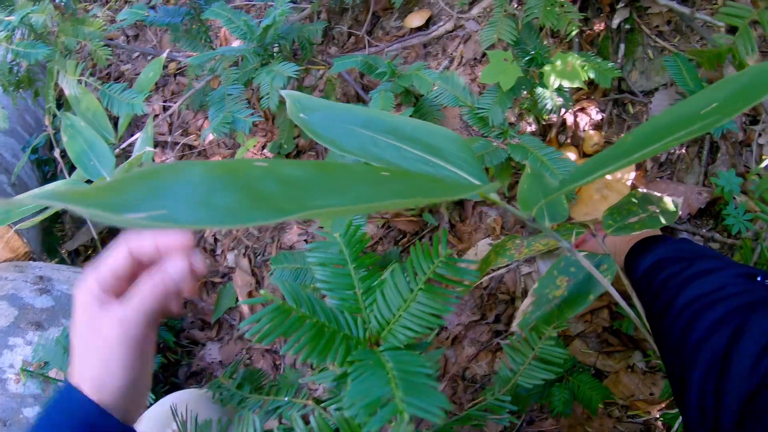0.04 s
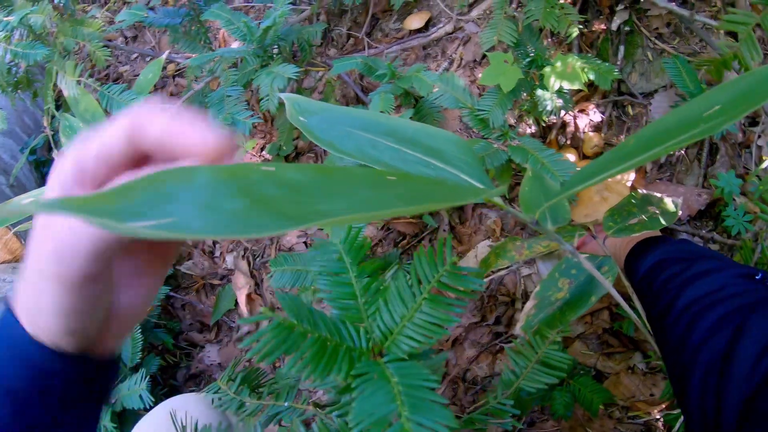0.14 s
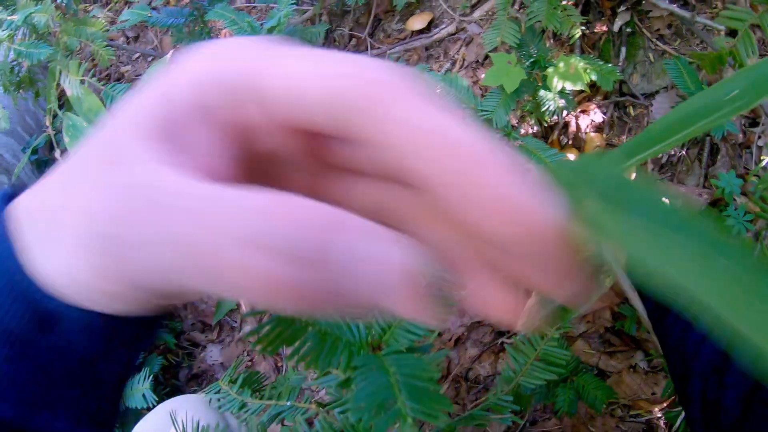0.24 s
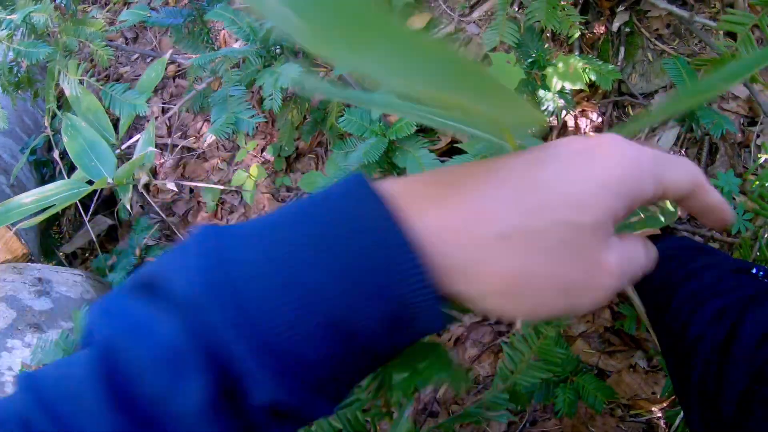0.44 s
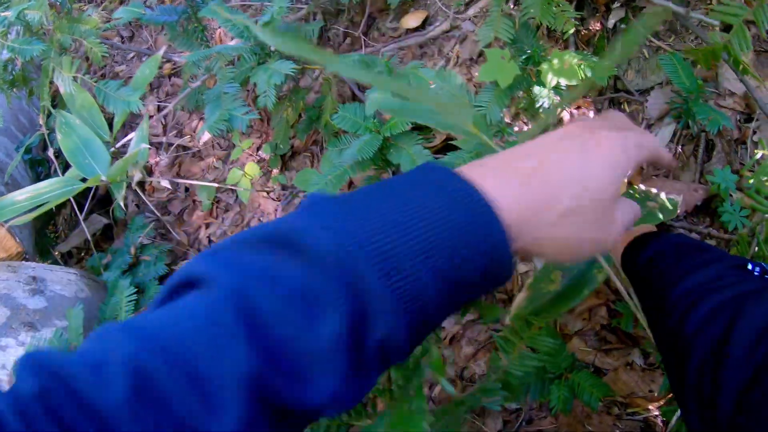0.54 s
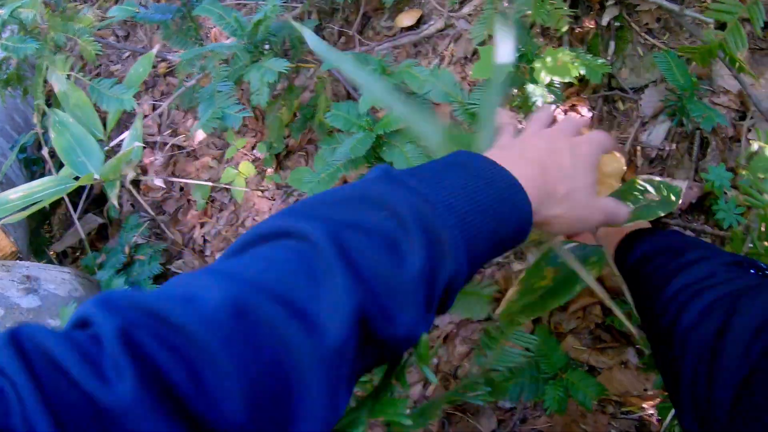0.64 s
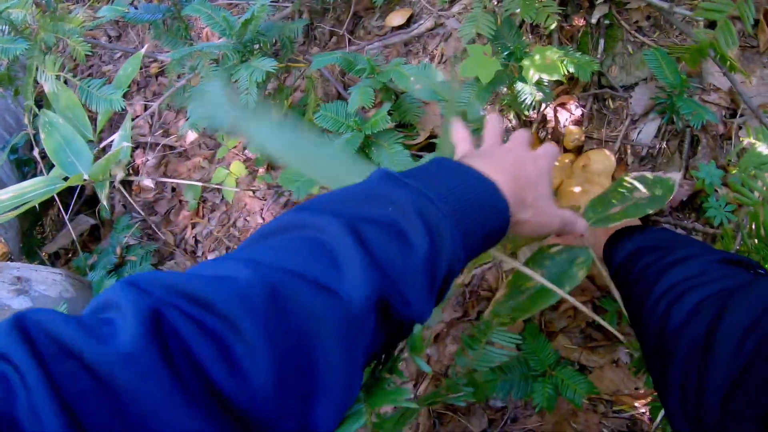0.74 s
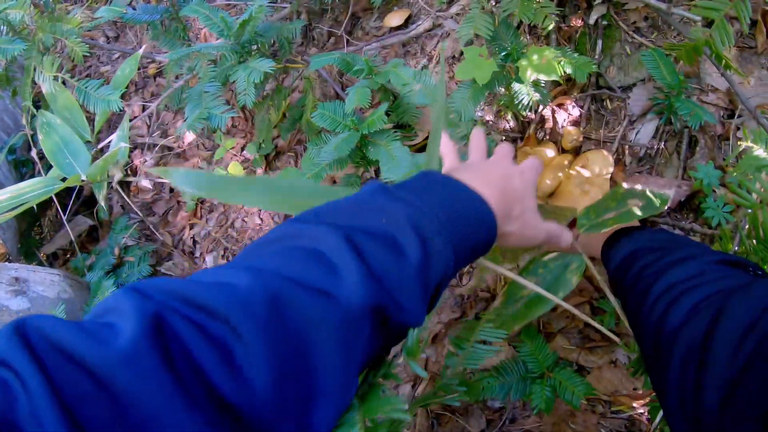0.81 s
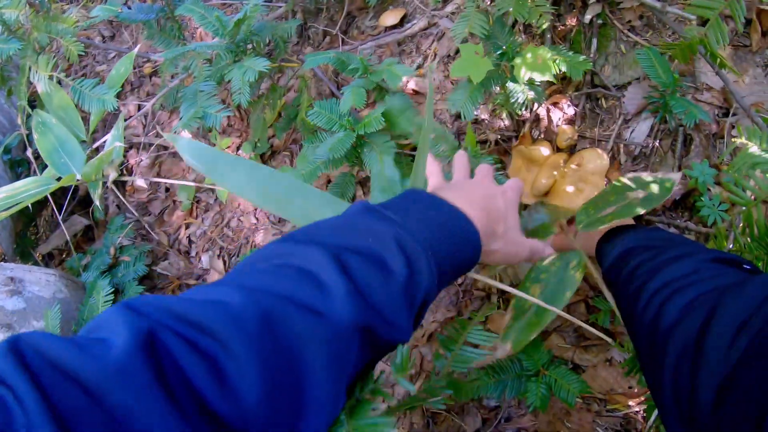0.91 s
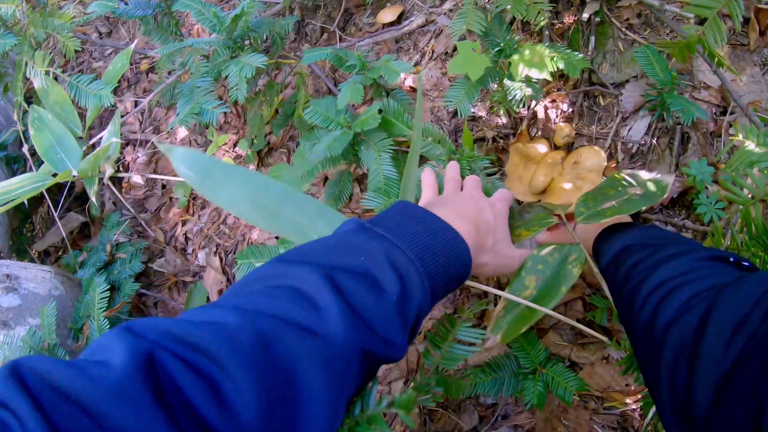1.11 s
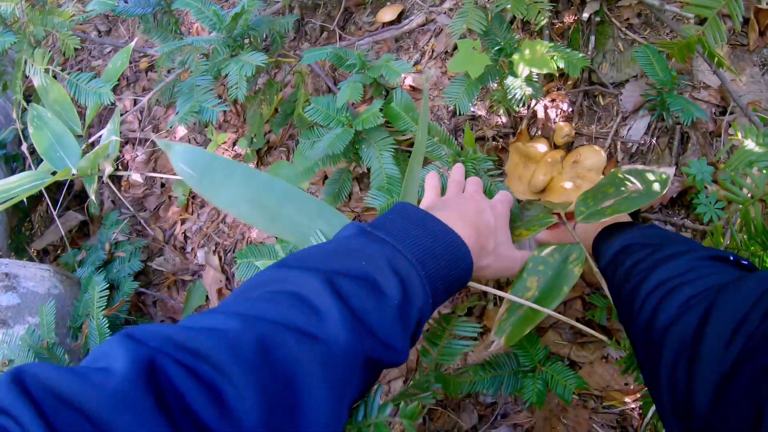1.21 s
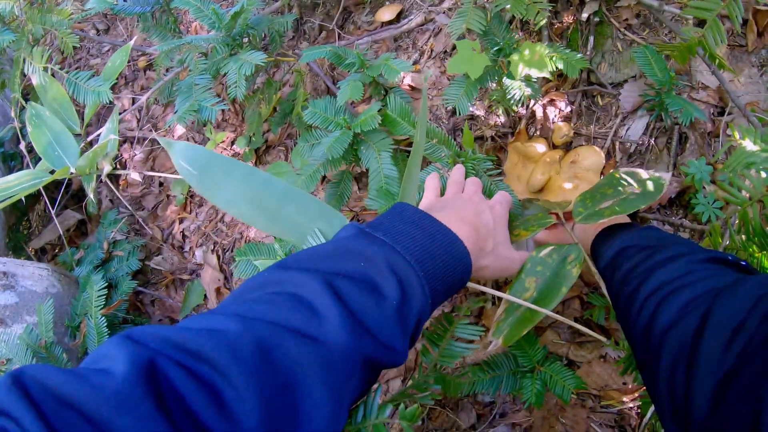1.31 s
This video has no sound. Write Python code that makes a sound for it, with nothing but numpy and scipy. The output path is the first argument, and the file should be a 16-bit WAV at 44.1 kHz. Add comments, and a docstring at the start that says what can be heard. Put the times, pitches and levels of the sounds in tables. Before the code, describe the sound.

A stiff leaf snaps and scrapes roughly past a small body-worn camera, knocking its case, after a quiet crackle of litter; then drier, softer rustles and twig cracks follow further off on a quiet forest floor.

```python
"""A faint hiss of woods and a dry crackle of litter come first, as a hand pushes through undergrowth on a
forest floor. A stiff leaf then snaps and scrapes past the right side of a small camera, with low thuds and
short rough knocks giving it body; after it, dry litter rustles and cracks further off. Leaves are streams of
random clicks shaped by spectra and envelopes, snaps are decaying ringing noise, thuds are short sagging sines,
and the rumbles are lumpy low noise. Each layer reaches two microphone ports with its own likeness, side level
and phase."""
import sys
import numpy as np
from scipy import signal
from scipy.fft import rfft, irfft, next_fast_len
from scipy.io import wavfile
from scipy.ndimage import uniform_filter1d, map_coordinates

SR = 44100
rng = np.random.default_rng(int(sys.argv[2]) if len(sys.argv) > 2 else 0)


def undo_db(level):
    """Turn decibels back into plain size, where 20 dB means ten times bigger."""
    steps = np.asarray(level, float) / 20
    return 10 ** steps


def store_wav(level_fs):
    """Save 16-bit WAV to argv[1]."""
    pcm = np.round(np.clip(np.atleast_2d(level_fs), -1, 1) * 32767)
    wavfile.write(sys.argv[1], SR, pcm.T.astype(np.int16))


N = 59535


def along(points, hz):
    """Logarithmic frequency scale: (frequency [Hz], value) points joined on a log axis."""
    f, v = np.transpose(points)
    return np.interp(np.log(hz + 1), np.log(f + 1), v)


def unit(x):
    """Normalisation: scales a signal to an rms of 1."""
    return x / np.sqrt(np.mean(x ** 2) + 1e-20)


def level_curve(rows, outside_db=-120):
    """Amplitude envelope: gain per sample from (time [s], level [dB]) rows."""
    s, db = np.transpose(rows)
    return undo_db(np.interp(np.arange(N) / SR, s, db, left=outside_db, right=outside_db))


def wobble(rate):
    """Random modulation: a smooth curve through rate random knots a second, at most 2000."""
    knots = rng.standard_normal(3000)
    return map_coordinates(knots, [np.arange(N) * min(rate, 2000) / SR])


def filtered(x, response):
    """Linear filtering: the spectrum of x times a response of frequency."""
    m = next_fast_len(N + 8192)
    spectrum = rfft(x, m) * response(np.fft.rfftfreq(m, 1 / SR))
    return irfft(spectrum, m)[..., :N]


def coloured(x, colour):
    """Spectral shaping: x through a (frequency [Hz], level [dB]) spectrum, at an rms of 1."""
    return unit(filtered(x, lambda hz: undo_db(along(colour, hz))))


def grains(spike_db, patchy_db):
    """Granular noise: two alike streams of tiny clicks, a few much bigger, in patches of random colour."""
    size = undo_db(spike_db * rng.exponential(1, N))
    z = signal.stft(size * rng.standard_normal((2, N)), nperseg=128)[2]
    field = uniform_filter1d(rng.standard_normal(z.shape[1:]), 4, 0)  # smoothed over frequency
    field = uniform_filter1d(field, 6, 1)  # and over time
    return signal.istft(z * undo_db(patchy_db * unit(field)), nperseg=128)[1][:, :N]


def ports(pair, alike, side, lead):
    """Partial coherence: two ports mix a shared and an unshared sound, with level and phase split evenly."""
    def response(hz):
        turn = np.arccos(np.clip(along(alike, hz), 0, 1)) / 2
        tilt = undo_db(along(side, hz) / 2) * np.exp(.5j * along(lead, hz))
        left = [np.cos(turn) * tilt, np.sin(turn) * tilt]
        right = [np.cos(turn) / tilt, -np.sin(turn) / tilt]
        return np.array([left, right])
    return filtered(pair[None], response).sum(axis=1)


# spectrum of the low rumbles of ground and case: (frequency [Hz], level [dB])
RUMBLE_COLOUR = [(15, -44), (25, -10), (54, -5.5), (161, -4.5), (210, 1.5), (600, -12), (780, 0),
                 (1320, -120)]


def rumble(rows):
    """Amplitude-modulated noise: lumpy low noise on a level curve."""
    lumps = undo_db(2.5 * wobble(45))
    return level_curve(rows) * coloured(lumps * rng.standard_normal((2, N)), RUMBLE_COLOUR)


# spectrum of the hiss of the woods: (frequency [Hz], level [dB])
FOREST_COLOUR = [(30, -44), (210, -9), (1000, -13), (2400, -2.5), (4700, -10.5), (9500, -11), (12000, -26),
                 (14500, -33), (15700, -42)]
# low rumble of the soft ground: (time [s], level [dB])
GROUND_LEVEL = [(0, -67), (.19, -68.5), (.55, -66), (.7, -62.5), (.86, -67), (.95, -63), (1.1, -74),
                (1.22, -63), (1.35, -75)]
# likeness of the two ports for far sounds: (frequency [Hz], coherence [0 to 1])
FAR_LIKENESS = [(80, 0.42), (300, 0.9), (900, 0.13), (3300, 0.38), (6000, 0.62), (10000, 0.059)]
# side balance of far sounds: (frequency [Hz], left minus right [dB])
FAR_BALANCE = [(200, 0), (900, -4.5), (4000, -2.5), (10000, -7)]
# phase of far sounds: (frequency [Hz], lead of the left port [rad])
FAR_PHASE = [(400, -0.56), (1000, -3), (2000, -6), (3300, -6), (10000, -8.5)]


def forest():
    """Stationary noise: a faint steady hiss of the woods, over the varying rumble of the ground."""
    hiss = undo_db(-55) * coloured(grains(0.21, 2.34), FOREST_COLOUR)
    return ports(hiss + rumble(GROUND_LEVEL), FAR_LIKENESS, FAR_BALANCE, FAR_PHASE)


def strokes(rows, colour, spike_db, patchy_db, flutter_db):
    """Friction noise: each stroke starts quickly, swells or fades, and stops short as the leaf slips free."""
    rise_s, stop_s, tilt_hz = 0.0018, 0.0045, 4500  # tilt_hz: pivot of the brightness
    t, out = np.arange(N) / SR, np.zeros((2, N))
    fizz = undo_db(flutter_db * wobble(150)) * grains(spike_db, patchy_db)
    for start, end, first_db, last_db, tilt in rows:
        tilted = lambda hz: undo_db(along(colour, hz) + tilt * np.log2((hz + 200) / tilt_hz))
        edge = (1 + np.tanh((t - start) / rise_s)) * (1 + np.tanh((end - t) / stop_s)) / 4
        swell = undo_db(np.interp(t, [start, end], [first_db, last_db]))
        out += edge * swell * unit(filtered(fizz, tilted))
    return out


# dry litter settling under hand and feet: (time [s], level [dB])
LITTER_LEVEL = [(0, -55.5), (.19, -64.5), (.5, -49), (.75, -48.5), (.85, -55), (1.15, -63), (1.26, -56.5),
                (1.35, -79)]
# spectrum of litter and brushed leaves: (frequency [Hz], level [dB])
LEAF_COLOUR = [(250, -11), (500, -7.5), (950, -16.5), (1500, -7), (2600, -2), (3500, -3), (7300, -9.5),
               (9400, -4.5), (11800, -22), (14500, -28), (15700, -50)]
# swishes of leaves brushed by the hand:
# (start [s], end [s], first level [dB], last level [dB], brightness [dB per octave])
SWISHES = [(.62, .655, -53, -49.5, 1), (.655, .73, -44, -37.5, 3.5), (.73, .755, -47.5, -45, 1.5),
           (.755, .776, -32.5, -39.5, 1), (.776, .808, -47.5, -39, 1), (.88, .946, -45.5, -41, 4.5),
           (.946, .969, -48, -46, 2.5), (.969, 1.002, -38.5, -46, 0.5), (1.002, 1.029, -40, -46.5, 1),
           (1.031, 1.05, -46.5, -41.5, 1), (1.06, 1.12, -50.5, -47.5, 4)]


def litter():
    """Superposed impacts and friction: brushed leaves swish over a bed of dry crackle."""
    clumps = undo_db(2 * wobble(40) + 2 * wobble(200))
    bed = level_curve(LITTER_LEVEL) * coloured(clumps * grains(2.85, 1.02), LEAF_COLOUR)
    swishes = strokes(SWISHES, LEAF_COLOUR, spike_db=2.2, patchy_db=2.5, flutter_db=1.6)
    return ports(bed + swishes, FAR_LIKENESS, FAR_BALANCE, FAR_PHASE)


# snaps of dry leaves and twigs, levels before a 1 dB cut and the mix at the ports:
# (time [s], peak level [dB], ring pitch [Hz], left minus right [dB])
LEAF_SNAPS = [(0.0176, -33, 1450, -10.5), (0.0489, -44, 2240, -25), (0.2086, -14.5, 5050, 0),
              (0.2368, -18.5, 4160, -2), (0.2754, -11, 2720, -9.5), (0.4354, -21, 2000, 3),
              (0.457, -19, 3600, 6), (0.481, -23, 4360, -2), (0.5486, -30.5, 5400, -7.5),
              (0.5991, -28.5, 8100, -2), (0.761, -25.5, 3000, -2), (0.7788, -21, 3200, -2),
              (0.8219, -31, 3270, -1), (0.861, -33.5, 7900, -11), (0.8667, -30.5, 3330, -5.5),
              (0.917, -28, 5370, -9), (1.1561, -37, 3700, -7), (1.2009, -31, 3070, 0),
              (1.2427, -24, 3000, -4.5), (1.25, -24, 3300, -3), (1.2648, -34.5, 2640, -7),
              (1.303, -36.5, 2750, -13.5)]
# spectrum of the crack: (frequency [Hz], level [dB])
CRACK_COLOUR = [(600, -31.5), (1500, -6), (2800, -8.5), (5500, -4.5), (7300, -14), (9800, -3.5),
                (12000, -29), (15600, -31)]


def snaps():
    """Damped resonance: a short crack of noise, with a broad ring at the leaf's own pitch."""
    ring_db, ring_width = 5, .3  # level on the crack spectrum's scale; width over pitch
    t60_s, attack_s = .011, 0.00012
    out, t = np.zeros((2, 2, N + 2048)), np.arange(2048) / SR  # port, stream, sample
    f = np.fft.rfftfreq(2048, 1 / SR)
    envelope = undo_db(-60 * t / t60_s) * (1 - np.exp(-t / attack_s))
    for s, db, hz, pan in LEAF_SNAPS:
        w = ring_width * hz
        ring = abs(f * w / (hz * hz - f * f + 1j * f * w)) ** 2
        body = undo_db(along(CRACK_COLOUR, f)) + undo_db(ring_db) * ring
        hit = unit(irfft(rfft(rng.standard_normal((2, 2048))) * body)) * envelope
        hit = hit / np.abs(hit).max(axis=1, keepdims=True)
        gain = undo_db(db - 1 + np.array([pan, -pan]) / 2)
        out[:, :, round(s * SR):][..., :2048] += gain[:, None, None] * hit
    # each port keeps its own side of the mix; the balance is already in the gains
    return np.array([ports(out[k, :, :N], FAR_LIKENESS, [(1000, 0)], FAR_PHASE)[k] for k in range(2)])


# strokes of the stiff leaf past the camera:
# (start [s], end [s], first level [dB], last level [dB], brightness [dB per octave])
BLADE_STROKES = [(.211, .226, -29, -42, 0.5), (.226, .237, -42, -31.5, -1), (.237, .247, -33.5, -36.5, 0),
                 (.25, .273, -29, -31.5, -1), (.278, .289, -27, -25.5, 1.5), (.291, .317, -30, -28, 1.5),
                 (.319, .365, -27.5, -26.5, 1.14), (.366, .404, -35, -30.5, 1.5),
                 (.404, .438, -37, -32.5, -2.5), (.443, .464, -42.5, -33.5, -1)]
# spectrum of the scraping blade: (frequency [Hz], level [dB])
BLADE_COLOUR = [(180, -48), (300, -7), (517, -4), (864, -6.5), (1280, -4), (1850, -3.5), (9630, -3.5),
                (11900, -23), (14600, -27.5), (15600, -55)]
# the leaf rib rubs with a narrow tone as it slips off:
# (start [s], end [s], first level [dB], last level [dB], brightness [dB per octave])
RIB_RUBS = [(.38, .404, -37.5, -35.5, 0)]
# spectrum of the rib: (frequency [Hz], level [dB])
RIB_COLOUR = [(1100, -24), (2000, 4), (2900, -31)]
# likeness of the two ports for near sounds: (frequency [Hz], coherence [0 to 1])
NEAR_LIKENESS = [(600, 0.6), (1500, 0.78), (4000, 0.58), (9000, 0.41)]
# side balance of near sounds: (frequency [Hz], left minus right [dB])
NEAR_BALANCE = [(600, -2.5), (1600, -1), (5000, -8.5), (12000, -11)]
# phase of near sounds and of the case: (frequency [Hz], lead of the left port [rad])
NEAR_PHASE = [(100, -.2), (200, -1.1), (350, -2.2), (650, -3.2), (2000, -4.7), (3300, -6.2), (6000, -8),
              (12000, -11)]


def scrape():
    """Sliding friction: the stiff leaf drags past the right port, its blade broad and its rib narrow in band."""
    blade = strokes(BLADE_STROKES, BLADE_COLOUR, spike_db=1.8, patchy_db=3.5, flutter_db=1.5)
    rib = strokes(RIB_RUBS, RIB_COLOUR, spike_db=1, patchy_db=4, flutter_db=2.5)
    return ports(blade + rib, NEAR_LIKENESS, NEAR_BALANCE, NEAR_PHASE)


# low rumble of stems pressing on the case: (time [s], level [dB])
STEM_PRESS = [(.21, -58.5), (.3, -41.5), (.38, -43), (.45, -63), (.5, -58)]
# low thuds and short rough knocks, before rattle and ports; the envelope peaks at a quarter of the length: #
# (time [s], envelope peak [dB], starting pitch [Hz], length [s])
KNOCKS = [(0.251, -31.5, 518, 0.025), (0.276, -31.5, 1040, 0.013), (0.292, -37, 86.3, 0.04),
          (0.322, -22, 757, 0.0054), (0.351, -23.5, 1100, 0.0157), (0.359, -23, 325.5, 0.014),
          (0.36, -34, 114, 0.015), (0.376, -26.5, 305, 0.0069), (0.438, -36, 241, 0.011)]
# likeness of the two ports for the case: (frequency [Hz], coherence [0 to 1])
CASE_LIKENESS = [(60, .85), (170, .3), (350, .5), (700, .9)]
# side balance of the case: (frequency [Hz], left minus right [dB])
CASE_BALANCE = [(60, -10), (160, -9), (350, -5), (700, -1)]


def case():
    """Structure-borne sound: soft thuds of sagging pitch, and a lumpy rumble of stems pressing through the
    camera case."""
    rattle = .8  # share of random modulation on a thud
    out, t = np.zeros(N + 4096), np.arange(4096) / SR
    for s, db, hz, length in KNOCKS:
        u = t / length
        envelope = 4 * np.e * u * np.exp(-4 * u)
        tone = np.sin(2 * np.pi * hz * t * (1 - .12 * u))  # the pitch sags
        out[round(s * SR):][:4096] += undo_db(db) * envelope * tone
    press = rumble(STEM_PRESS)
    thuds = out[:N] * [1 + rattle * wobble(500), rattle * wobble(300)]  # shared, unshared
    return ports(press + thuds, CASE_LIKENESS, CASE_BALANCE, NEAR_PHASE)


def scene():
    """Superposition: the pressures of all layers add."""
    return scrape() + litter() + snaps() + case() + forest()


def band_limit(x):
    """A steep low-pass at the top of the band."""
    return signal.sosfilt(signal.butter(12, 15700, fs=SR, output="sos"), x)


def record(dry):
    """Band limitation: the camera passes only what lies below 15750 Hz."""
    mix = filtered(dry, lambda hz: hz < 15750)
    return band_limit(mix)


dry = scene()
out = record(dry)
store_wav(out)
```